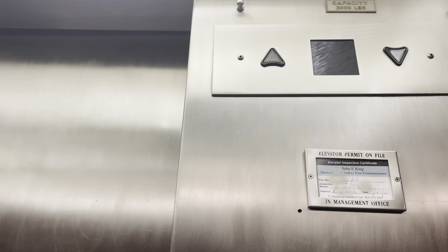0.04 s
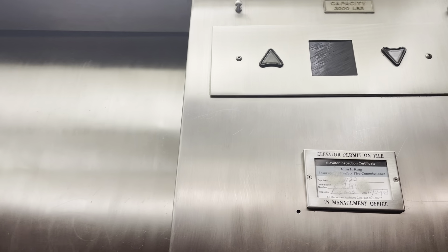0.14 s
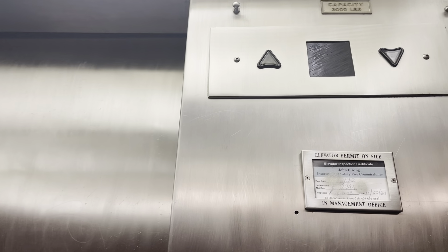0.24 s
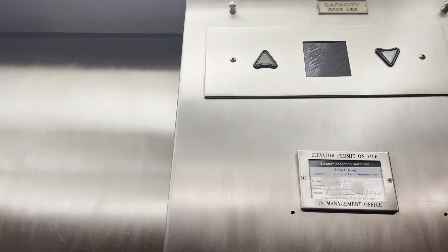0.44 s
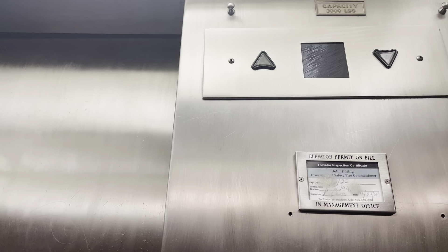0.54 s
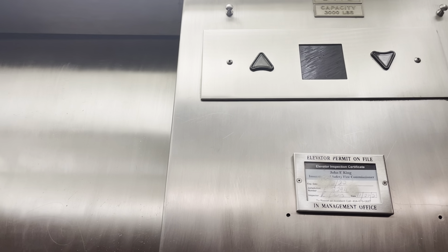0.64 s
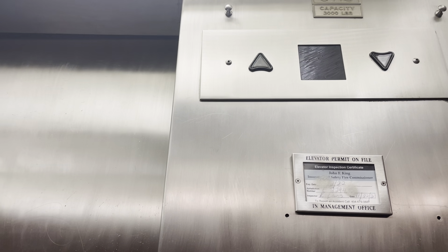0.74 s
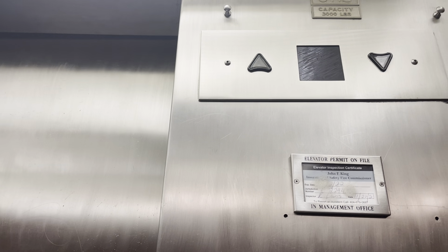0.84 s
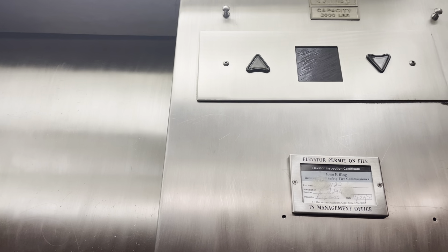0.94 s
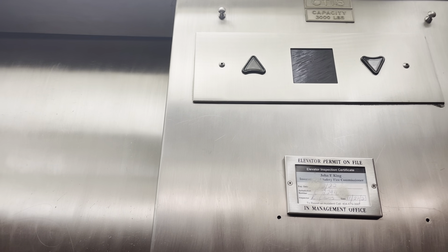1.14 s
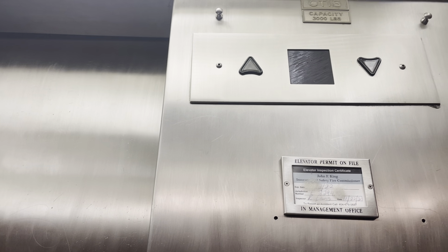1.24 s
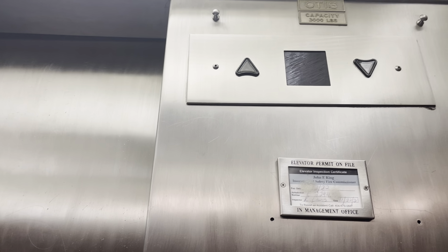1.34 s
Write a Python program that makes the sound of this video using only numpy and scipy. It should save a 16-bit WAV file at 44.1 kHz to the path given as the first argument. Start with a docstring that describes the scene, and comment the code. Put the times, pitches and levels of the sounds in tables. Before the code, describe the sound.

Heard from inside a steel elevator, the door machinery gives a rattling, ringing clunk, a thin squeak, then a second deep clunk with latch knocks. Air noise, a low hum and a faint whine continue throughout.

```python
"""Elevator doors clunking

Inside a steel elevator car the door machinery clunks twice over air noise, a low hum and a faint whine.
Each clunk is a quick run of blows: the car booms, the steel panels clash and ring, and the bare walls
smear the sound. The door gear slides before and after and squeaks thinly between the two clunks.
A latch knocks home with the second one."""
import sys
import numpy as np
from scipy import signal
from scipy.fft import irfft
from scipy.io import wavfile

SR = 44100
rng = np.random.default_rng(int(sys.argv[2]) if len(sys.argv) > 2 else 0)


def bounce(signal):
    """Save signal as a 16-bit WAV file at the path given by the first command-line argument."""
    frames = np.transpose(np.atleast_2d(signal))
    limited = np.clip(frames, -1, 1)
    pcm = np.round(limited * 32767).astype(np.int16)
    wavfile.write(sys.argv[1], SR, pcm)


N = 61739
TIME = np.arange(N) / SR

# Tone color of the ventilation: frequency_hz, level_db
AIR_SPECTRUM = [(20, -29), (30, -8), (42, -12), (60, 12.5), (100, -3), (160, -2.5), (230, -14.5),
                (450, -18), (750, -21), (1300, -34.5), (3000, -35.5), (4600, -38), (6500, -47.5),
                (9500, -50.5), (11500, -57), (13500, -84)]
# Low hum of the machinery: pitch_hz, level_db
HUM_TONES = [(59.5, -52.5), (116, -54.5), (149, -53), (180, -58), (228, -61.5)]
# Thin whine of the drive: pitch_hz, level_db
WHINE_TONES = [(2215, -87), (2590, -83), (2939, -77.5), (2998, -77), (3690, -99), (4081, -82), (4441, -73),
               (5039, -98), (9480, -92)]
# Slides of the door gear: start_s, length_s, level_db, fade_s
SLIDES = [(-.05, 0.85, -51, 0.0081), (0.136, 0.044, -61.5, 0.021), (0.26, .235, -52, 0.044),
          (.62, 0.17, -57.5, .02), (1.111, 0.13, -59, 0.06)]
# Tone color of the sliding: frequency_hz, level_db
SLIDE_SPECTRUM = [(100, 7.5), (240, 10), (380, 3), (700, -2), (1300, -1), (2200, -7), (4000, -12.5),
                  (6000, -15.5), (8500, -16.5), (11000, -25), (13500, -42)]

# Blows on the door panels: start_s, rise_s, body_db, clash_db, treble_db
BLOWS = [(.118, 0.0024, -44, -54.5, -63), (.276, 0.021, -29, -42, -45), (.291, 0.012, -36, -40.5, -46),
         (0.318, 0.0086, -38, -40, -44), (0.345, 0.007, -37, -45, -42.5), (.398, 0.0023, -39.5, -58, -58),
         (0.454, 0.0024, -48, -68, -48.5), (.505, 0.0035, -41.5, -60, -52), (.615, 0.0031, -70, -44, -47),
         (0.634, 0.0053, -32, -49, -58), (.686, 0.0049, -33, -53.5, -61.5), (0.755, 0.0021, -39, -53, -57),
         (.778, 0.0067, -37.5, -68, -80), (.845, 0.024, -39, -60, -66.5), (1.001, 0.0028, -44, -64.5, -77)]
# The low, middle and high parts of a blow: frequency_hz, level_db
BODY_SPECTRUM = [(30, -20), (60, 11), (120, 7.5), (200, 5), (350, 4), (520, -8), (800, -14), (1200, -27),
                 (2000, -54), (5000, -69)]
CLASH_SPECTRUM = [(100, -25), (450, -0.5), (850, 5.5), (1250, 7), (1600, 2.5), (2300, -3.5), (3300, -13),
                  (5300, -17.5), (7000, -40), (13000, -57)]
TREBLE_SPECTRUM = [(800, -36), (2500, 1.5), (4000, -4.5), (5400, -1), (6500, -2), (8500, 3.5), (10000, -6),
                   (12000, -13), (13300, -36)]
# Echo of the car: frequency_hz, decay_s (every decay_s is the time to fade by 60 dB)
CAR_ECHO = [(60, .5), (300, 0.45), (1000, 0.36), (3000, 0.54), (6000, 0.41), (12000, 0.27)]
# Ringing notes of the steel panels: pitch_hz, level_db, decay_s
PANEL_NOTES = [(443, 5, 0.61), (658, 2, 1), (777, 11.5, 0.34), (858, -24, 0.46), (1049, -24, 0.43),
               (1050, 3, .55), (1247, 5.5, 0.66), (1367, -7, 0.31), (1530, -23, 0.78), (1880, -4, 0.46),
               (1930, -6, 0.64), (2140, 5, 0.26), (2690, 5, 0.23), (2918, -8.5, 0.97), (5224, -21.5, 1)]
# Dull thuds of the door's weight, and two short knocks near 192 Hz and 355 Hz: start_s, level_db, pitch_hz,
# length_s
THUDS = [(0.2882, -26.5, 192, 0.0087), (.309, -24, 72, 0.051), (0.626, -27.5, 60.5, 0.093),
         (0.634, -27, 355.4, .03), (.675, -27, 95, .03)]
# Shoves that make the whole car boom: start_s, level_db, center_hz
SHOVES = [(.290, -34, 197), (.314, -29.5, 180), (.392, -31, 176), (.427, -29, 76), (.6375, -27.5, 101.5),
          (.737, -38, 73.6), (.835, -39.5, 139), (.959, -37, 51.7)]
# Low notes of the car: pitch_hz, level_db, decay_s, left_over_right_db
CAR_NOTES = [(59.3, 1.5, 0.76, -3), (75, 2.5, 0.18, -8), (88.37, 3.5, 0.65, -4), (120.96, 6, 0.37, -2),
             (147.9, 0.5, 0.81, -3), (169.6, 0.5, 0.755, -10), (182.6, -7, 0.45, -25), (242.4, 0, 0.36, -2),
             (261.4, -10, 0.46, -19), (292, -15.5, 0.8, -16), (352, -10.5, 0.77, -9)]
# Squeaks of the door gear: start_s, level_db, pitch_hz, decay_s
SQUEAKS = [(.346, -34, 5800, .04), (.429, -49.5, 9300, 0.18), (.430, -39, 7430, 0.076),
           (.451, -45, 7200, 0.28), (.452, -47, 9050, .3), (0.431, -52, 2460, 0.59),
           (0.559, -52, 6040, 0.026)]
# Knocks of the latch: start_s, level_db, pitch_hz, decay_s
KNOCKS = [(0.635, -45.5, 345, 0.32), (.638, -42.5, 744, 0.15), (0.755, -49, 1003, 0.23),
          (0.775, -50, 990, 0.1), (0.844, -45, 356, 0.44), (1.004, -56, 427, .4)]

# How alike scattered sound is on the left and right: frequency_hz, likeness (0 to 1)
STEREO_LIKENESS = [(60, 1), (130, 0.75), (280, 0.35), (600, 0.93), (1300, .4), (2500, 0.22), (4600, 0.68),
                   (6200, 0.53), (7200, 0.99), (12000, 0.62)]
# How far its left wave runs ahead of its right: frequency_hz, lead_radians
LEFT_LEAD = [(100, 0), (700, 1.5), (1400, 1), (2400, 0.98), (4700, 0), (5600, -1.2), (6200, -1.5),
             (6700, -3), (7300, -3), (8200, -2.5), (9200, -4.5), (10500, -6.5), (13000, -5)]
# How much louder it is on the left: frequency_hz, left_over_right_db
STEREO_BALANCE = [(60, -2), (170, -6.5), (300, -3), (500, 2), (2000, -0.5), (5000, 2.5), (9000, 0)]


def amp(db):
    """Turns decibels into a gain to multiply by."""
    return 10 ** (np.asarray(db) / 20)


def unit(x):
    """Scales to an average power of one."""
    return x / np.sqrt(np.mean(abs(x) ** 2) + 1e-20)


def read(table, hz):
    """Reads between a table's rows on a log-frequency scale."""
    frequencies, values = np.transpose(table)
    return np.interp(np.log(hz + 1), np.log(frequencies + 1), values)


def color(spectrum, hz):
    """Turns a spectrum into gains with an average power of one."""
    return unit(amp(read(spectrum, hz)))


def pan(left_over_right_db):
    """Left and right gains for a level difference."""
    return amp(np.array([[1], [-1]]) * left_over_right_db / 2)


def onset(start_s, rise_s):
    """A smooth step from 0 to 1."""
    return np.sin(np.pi / 2 * np.clip((TIME - start_s) / max(rise_s, 1e-4), 0, 1)) ** 2


def scattered_noise(gain, size=512):
    """Stereo noise scattered around the car; gain(hz, t) shapes it over frequency and time."""
    hop = size // 4
    hz = np.fft.rfftfreq(size, 1 / SR)
    t = np.arange(N // hop + 2)[:, None] * hop / SR
    a, b, c, d = rng.standard_normal((4, len(t), len(hz)))
    left, unrelated = a + 1j * b, c + 1j * d
    likeness = np.clip(read(STEREO_LIKENESS, hz), 0, 1)
    right = likeness * left + np.sqrt(1 - likeness ** 2) * unrelated
    right *= np.exp(-1j * read(LEFT_LEAD, hz))
    spectra = np.array([left, right]) * pan(read(STEREO_BALANCE, hz))[:, None] * gain(hz, t)
    _, noise = signal.istft(spectra.transpose(0, 2, 1), nperseg=size, noverlap=size - hop)
    return noise[:, :N] * np.sqrt(np.pi / size)


def wavering_tones(table, drift_hz, depth=0.18):
    """Steady tones that waver a little; a larger drift_hz makes them waver faster."""
    out = 0
    for hz, db in table:
        rates_hz = drift_hz * rng.standard_normal(size=8)
        drift = unit(sum(np.exp(2j * np.pi * (rate * TIME + rng.random())) for rate in rates_hz))
        tone = np.exp(2j * np.pi * (hz * TIME + rng.random()))
        out += amp(db) * np.sqrt(2) * ((1 + depth * drift) * tone).real
    return out


def ventilation(level_db=-44.5):
    """Moving air rumbles and hisses steadily."""
    return amp(level_db) * scattered_noise(lambda hz, t: color(AIR_SPECTRUM, hz), size=4096)


def machinery():
    """The machinery hums, a little to the right, and its drive whines on both sides."""
    hum = pan(-4) * wavering_tones(HUM_TONES, drift_hz=3.95)
    whine = np.array([wavering_tones(WHINE_TONES, drift_hz=12) for side in range(2)])
    return hum + whine


def gear_sliding():
    """The door gear makes a soft rush while it moves."""
    level = 0
    for start_s, length_s, db, fade_s in SLIDES:
        fade_in = onset(start_s - fade_s / 2, fade_s)
        fade_out = 1 - onset(start_s + length_s - fade_s / 2, fade_s)
        level += amp(db) * fade_in * fade_out
    return level * scattered_noise(lambda hz, t: color(SLIDE_SPECTRUM, hz))


def panel_blow(start_s, rise_s, body_db, clash_db, treble_db, ring_over_clash_db=-13):
    """Struck sheet steel clashes and dies away between the walls, with a few notes ringing out."""
    def dying_clash(hz, t):
        body = amp(body_db) * color(BODY_SPECTRUM, hz)
        clash = amp(clash_db) * color(CLASH_SPECTRUM, hz)
        treble = amp(treble_db) * color(TREBLE_SPECTRUM, hz)
        return (body + clash + treble) * amp(-60 * np.maximum(t - start_s, 0) / read(CAR_ECHO, hz))
    age = np.maximum(TIME - start_s, 0)
    ring = 0
    for hz, db, decay_s in PANEL_NOTES:
        note = np.sin(2 * np.pi * (hz * age + rng.random((2, 1))))
        ring += amp(db - 60 * age / decay_s) * note
    ring *= amp(clash_db + ring_over_clash_db)
    return onset(start_s, rise_s) * (scattered_noise(dying_clash) + ring)


def door_thud(start_s, level_db, pitch_hz, length_s):
    """A short swell of low tone: the door's weight pushes the air in the car back and forth a few times, or a
    part knocks dully."""
    age = TIME - start_s
    swell = np.sin(np.pi * np.clip(age / length_s, 0, 1)) ** 2
    return pan(-1.5) * amp(level_db) * swell * np.sin(2 * np.pi * pitch_hz * age)


def car_boom(start_s, level_db, center_hz, reach_octaves=0.62):
    """A shove rings the low notes of the car, most of all those near center_hz."""
    age = np.maximum(TIME - start_s, 0)
    out = 0
    for hz, db, decay_s, left_over_right_db in CAR_NOTES:
        share = 1 / (1 + (np.log2(hz / center_hz) / reach_octaves) ** 2)
        note = amp(db - 60 * age / decay_s) * np.sin(2 * np.pi * hz * age)
        out += pan(left_over_right_db) * share * note
    return amp(level_db) * onset(start_s, rise_s=0.012) * out


def resonance(start_s, level_db, pitch_hz, decay_s, rise_s, width_hz):
    """A part rings briefly: a narrow band of noise around one pitch dies away."""
    band = scattered_noise(lambda hz, t: unit(1 / (1 + ((hz - pitch_hz) / width_hz) ** 2)), size=1024)
    age = np.maximum(TIME - start_s, 0)
    return band * onset(start_s, rise_s) * amp(level_db - 60 * age / decay_s)


def gear_squeaks():
    """The door gear rings at high pitches in thin squeaks."""
    return sum(resonance(*row, rise_s=0.0021, width_hz=150) for row in SQUEAKS)


def latch_knocks():
    """The latch strikes home with hollow knocks."""
    return sum(resonance(*row, rise_s=0.004, width_hz=80) for row in KNOCKS)


def steel_walls(sound, depth_db=2, from_hz=960, size=16384):
    """Standing waves between the walls boost and cut random frequencies, mostly above from_hz."""
    hz = abs(np.fft.fftfreq(size, 1 / SR))
    delay_s = np.arange(size // 2 + 1) / SR
    def ripple(width_hz):
        echoes = rng.standard_normal(len(delay_s)) * delay_s * np.exp(-(delay_s * width_hz * 2) ** 2)
        return unit(irfft(echoes))
    peaks = ripple(width_hz=25.2) + ripple(width_hz=109)  # the nearest walls make the broad ones
    gain = unit(amp(depth_db * peaks * hz ** 2 / (hz ** 2 + from_hz ** 2)))
    # Build the filter with these gains that responds soonest (minimum phase).
    response = np.exp(np.conj(signal.hilbert(np.log(gain))))
    taps = np.fft.ifft(response).real[:size // 2]
    return signal.oaconvolve(sound, taps[None])[:, :N]


def scene():
    """Adds up everything heard in the car."""
    clunks = sum(panel_blow(*row) for row in BLOWS) + latch_knocks()
    squeaks = gear_squeaks()
    bass = sum(door_thud(*row) for row in THUDS) + sum(car_boom(*row) for row in SHOVES)
    return steel_walls(ventilation() + gear_sliding() + clunks + squeaks) + machinery() + bass


def record(dry):
    """Fades the very end and cuts off the highest treble."""
    fade_s, cutoff_hz = 0.004, 13200
    fade_out = 1 - onset(TIME[-1] - fade_s, fade_s)
    low_pass = signal.firwin(511, cutoff_hz, window=("kaiser", 9), fs=SR)
    return signal.oaconvolve(dry * fade_out, low_pass[None], "same")


dry = scene()
out = record(dry)
bounce(out)
```